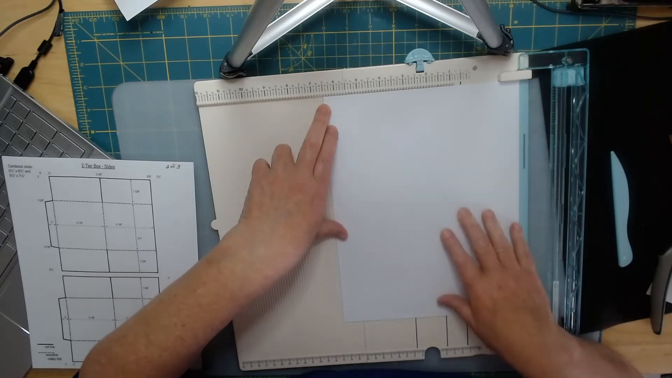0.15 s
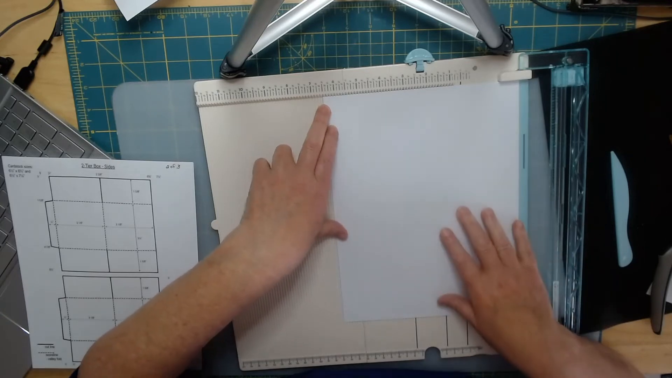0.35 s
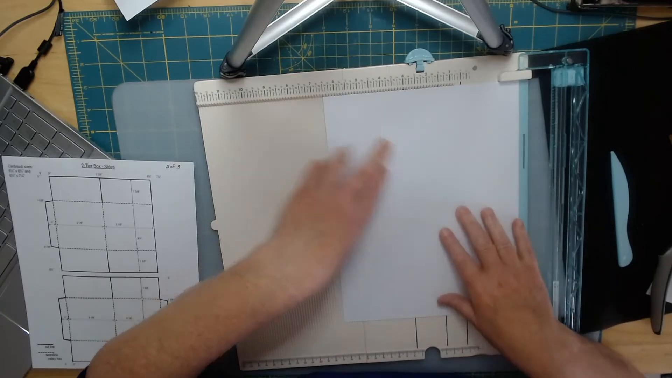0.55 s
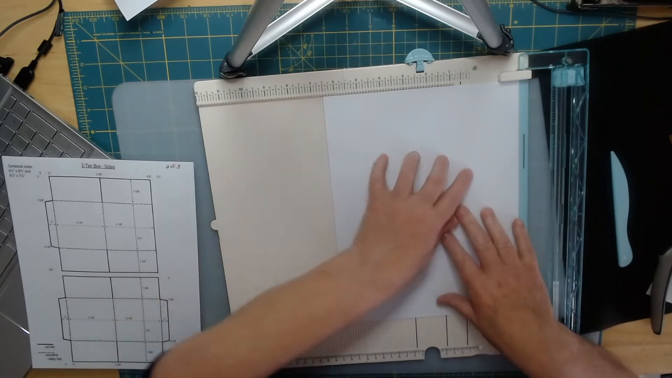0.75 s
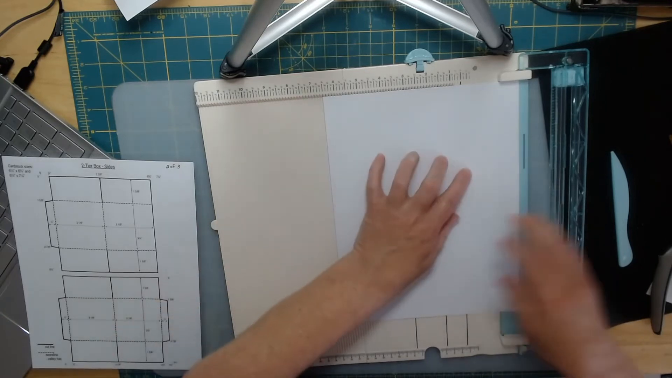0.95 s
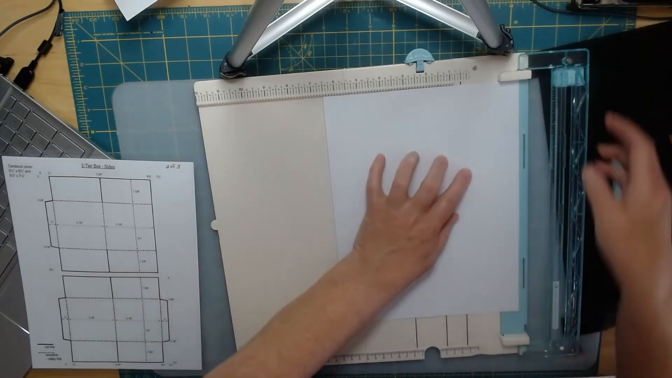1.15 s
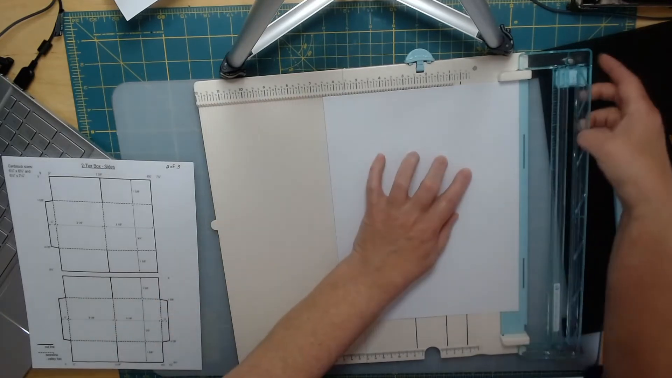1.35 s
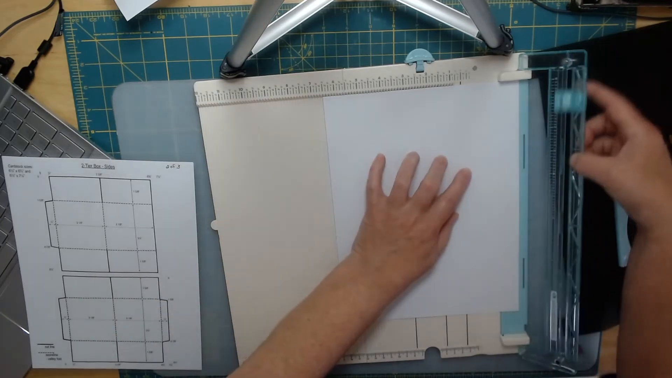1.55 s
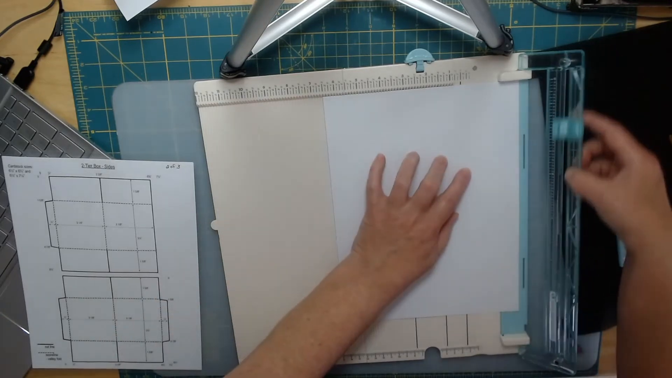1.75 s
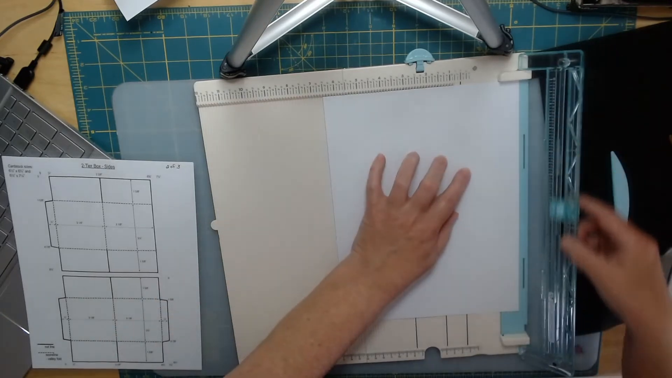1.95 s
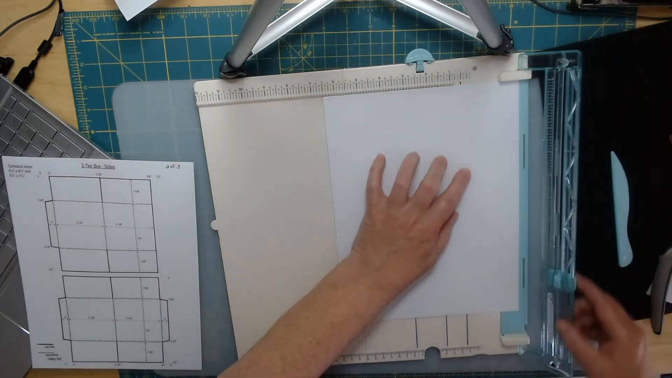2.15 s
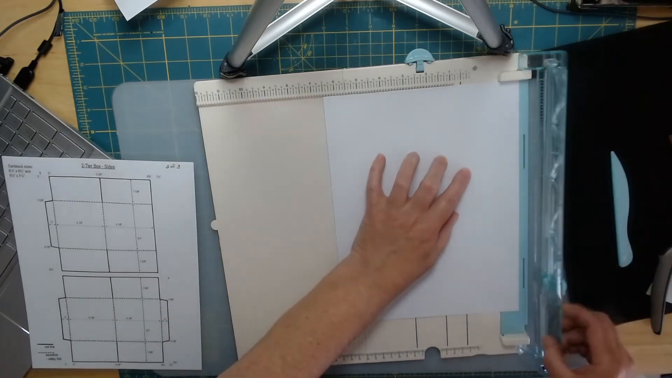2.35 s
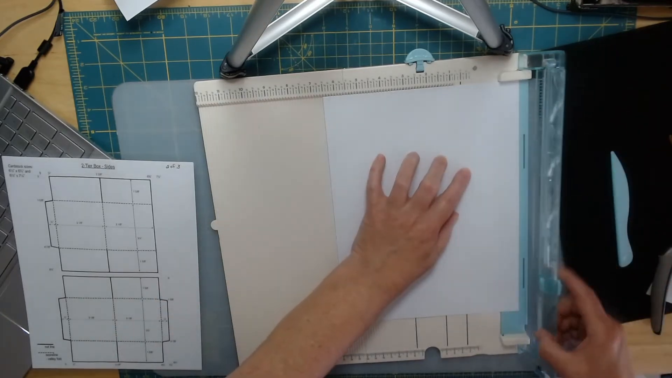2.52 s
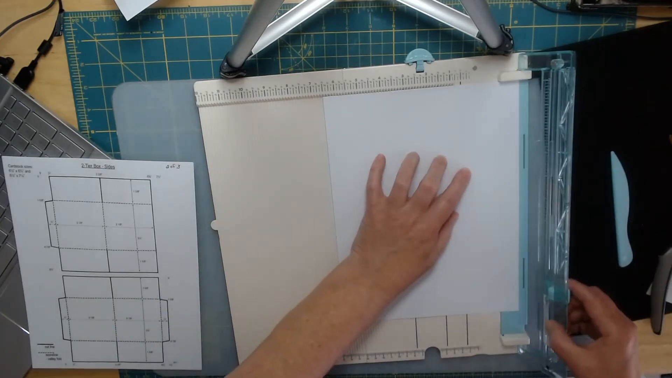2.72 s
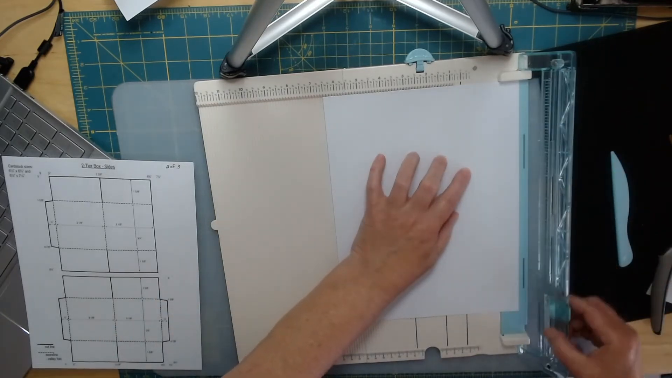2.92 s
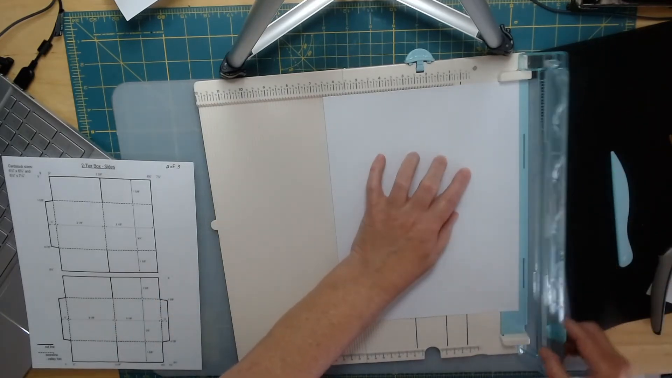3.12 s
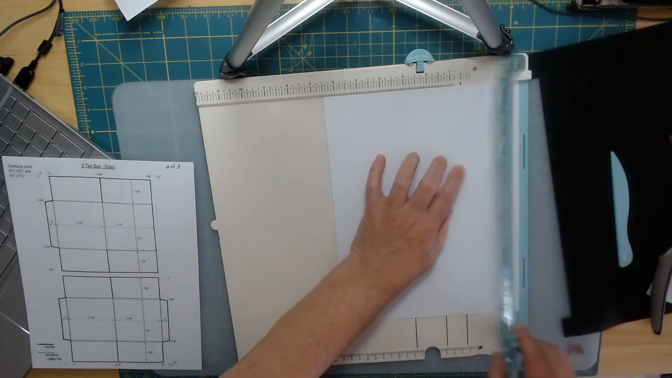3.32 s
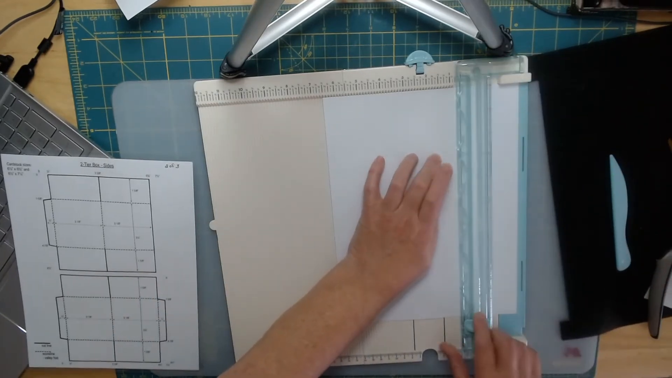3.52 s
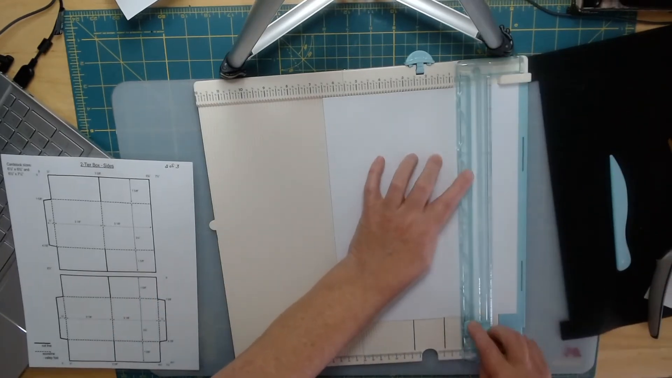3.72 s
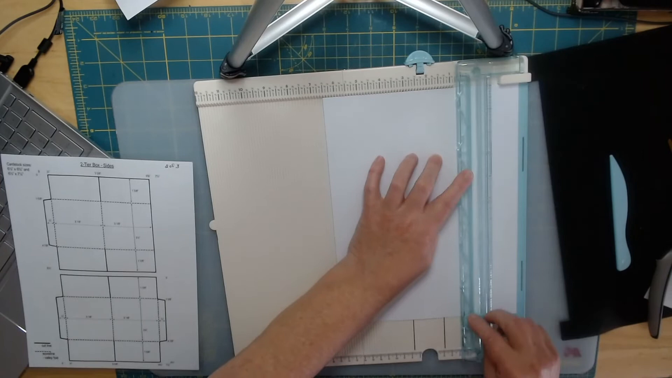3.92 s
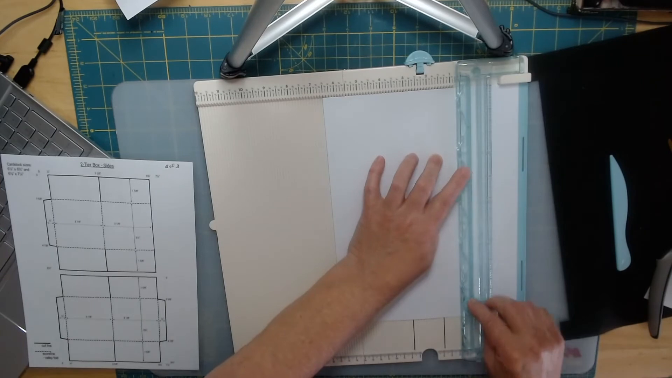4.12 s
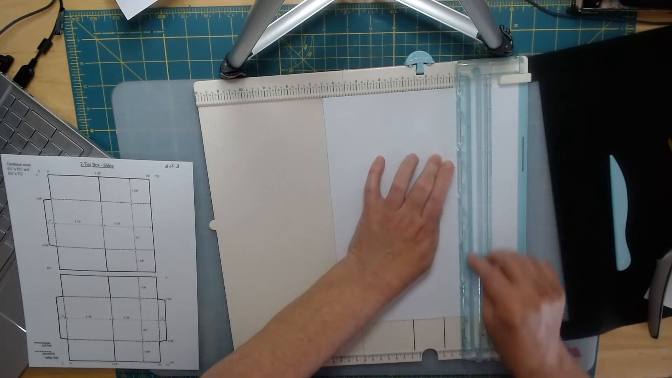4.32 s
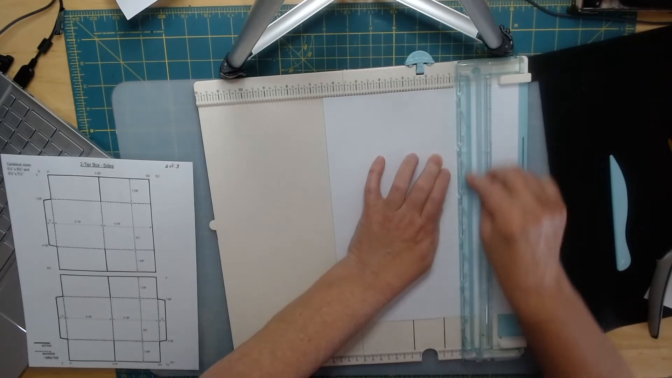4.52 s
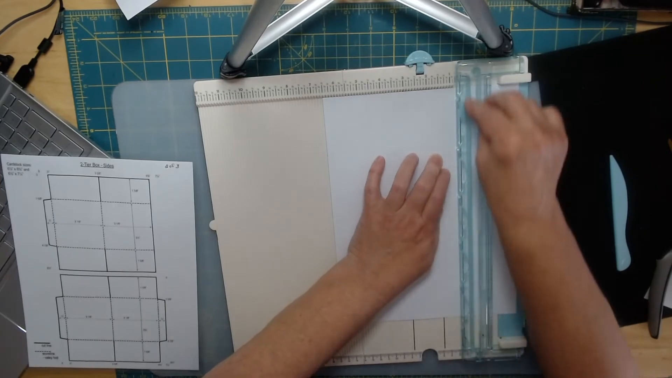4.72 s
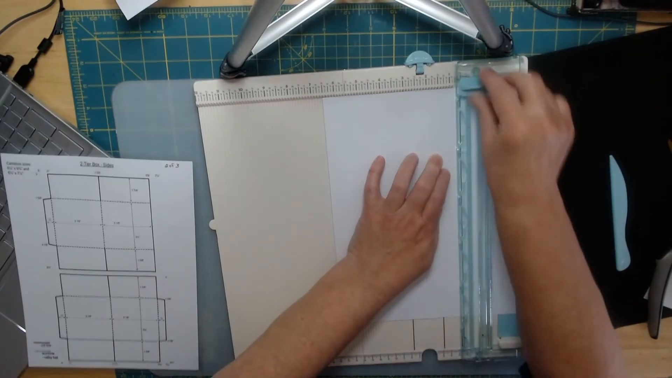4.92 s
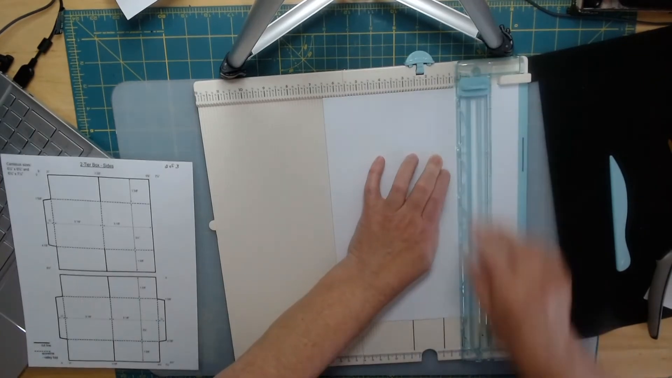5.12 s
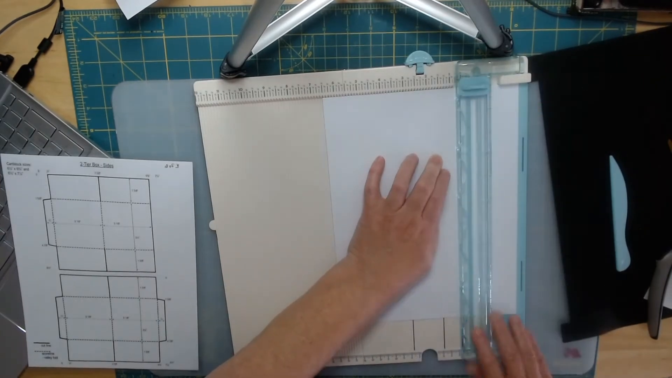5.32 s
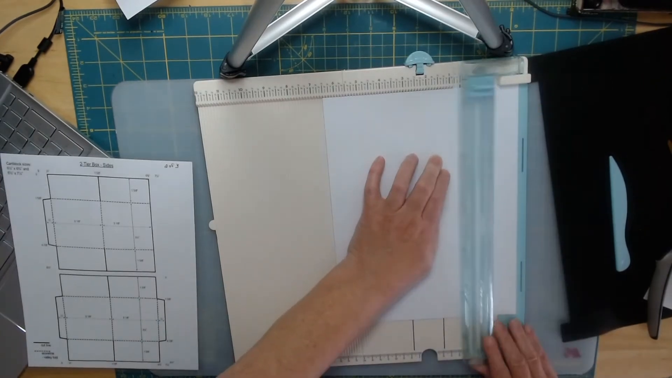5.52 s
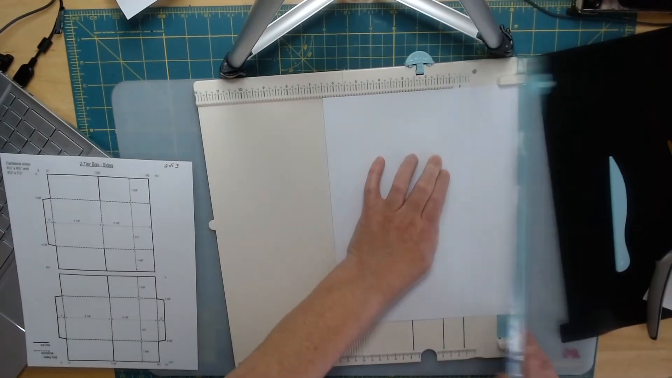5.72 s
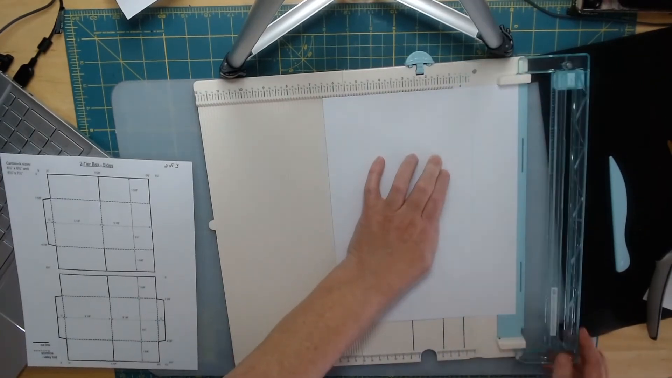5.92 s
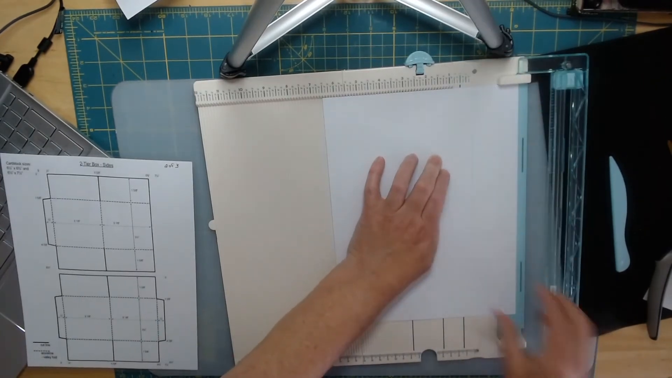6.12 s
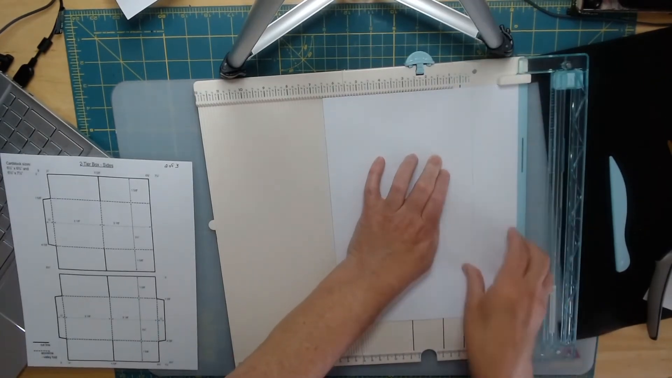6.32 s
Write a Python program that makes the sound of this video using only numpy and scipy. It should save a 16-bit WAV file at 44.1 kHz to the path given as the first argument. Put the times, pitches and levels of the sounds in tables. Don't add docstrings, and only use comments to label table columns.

```python
import sys
import numpy as np
from scipy import signal
from scipy.fft import rfft, irfft, next_fast_len
from scipy.io import wavfile
from scipy.ndimage import uniform_filter1d, map_coordinates

SR = 44100
rng = np.random.default_rng(int(sys.argv[2]) if len(sys.argv) > 2 else 0)


def field_ratio(decibels):
    return 10 ** (np.asarray(decibels, dtype=float) / 20)


def inscribe(sig):
    pcm = np.round(np.clip(np.atleast_2d(sig).T, -1, 1) * 32767)
    wavfile.write(sys.argv[1], SR, pcm.astype(np.int16))


N = 284974

# pitch_hz, width_hz, level_db
RAIL_MODES = [(1381, 150, 1.5), (1654, 700, 1), (2118, 610, 1.5), (2530, 430, 2.5), (3260, 810, -2),
              (3870, 310, -3), (4170, 550, -5.5), (4570, 200, -4.5), (4836, 140, -7)]
# pitch_hz, width_hz, level_db
BOARD_MODES = [(332, 38, -4), (481, 80, -1.5), (641.5, 89, 3), (785, 140, 0.5), (920, 61, 3),
               (981, 96, -1.5), (1124, 98, 0), (1270, 240, -9)]
# pitch_hz, width_hz, level_db
DESK_MODES = [(62, 33, 1.5), (122.5, 26, -3), (167, 39, -1), (246, 100, -4.5), (289.5, 17, 2)]
# freq_hz, level_db
EDGE_COLOUR = [(3500, -21.5), (5200, 9.5), (7000, 4), (9000, -3), (12000, -16), (15000, -31), (16500, -46),
               (17000, -120)]


def unit(x):
    return x / np.sqrt(np.mean(x ** 2) + 1e-20)


def along(points, hz):
    f, v = np.transpose(points)
    return np.interp(np.log(hz + 1), np.log(f + 1), v)


def curve(rows):
    s, db = np.transpose(rows)
    return np.interp(np.arange(N) / SR, s, db, -200, -200)


def swells(rows):
    s, rise, fall, db, *trims = np.transpose(rows)[:, :, None]
    late = np.arange(0, N + 64, 64) / SR - s
    gain = field_ratio(db - 25 * np.maximum(-late / np.abs(rise), late / np.abs(fall)))
    return [np.repeat(np.sum(gain * field_ratio(trim), axis=0), 64)[:N] for trim in [0, *trims]]


def smooth(gain):
    return uniform_filter1d(gain, size=300)


def wobble(rate):
    knots = rng.standard_normal(int(N * rate / SR) + 4)
    return map_coordinates(knots, [np.arange(N) * rate / SR])


def modes(table, hz, stir_db=0):
    c, w, db = np.transpose(table)[:, :, None]
    sign = (-1.) ** np.arange(len(table))[:, None]
    return np.sum(sign * field_ratio(db + stir_db) * 1j * hz * w / (c * c - hz * hz + 1j * hz * w), axis=0)


def body(table, hz, stir_db=0):
    return modes(table, hz, stir_db) / (1 + 1j * hz / (2.5 * table[-1][0])) ** 2


def filtered(x, response):
    size = next_fast_len(len(x) + 8192)
    return irfft(rfft(x, size) * response(np.fft.rfftfreq(size, 1 / SR)), size)[:len(x)]


def grit(spiky_db, patchy_db):
    force = rng.standard_normal(N) * field_ratio(spiky_db * wobble(780))
    z = signal.stft(force, nperseg=512)[2]
    field = uniform_filter1d(rng.standard_normal(z.shape), size=2, axis=0)
    field = uniform_filter1d(field, size=10, axis=1)
    return signal.istft(z * field_ratio(patchy_db * unit(field)), nperseg=512)[1][:N]


def quiet():
    # freq_hz, level_db
    air_colour = [(15, -47.5), (27, 0.5), (64, 4), (170, -23.5), (400, -14), (8590, -39), (14400, -44),
                  (16000, -67)]
    # pitch_hz, level_db
    whine_tones = [(59.5, -72), (5001, -91.5), (8000, -88.5), (8995, -103)]
    t = np.arange(N) / SR
    air = unit(filtered(rng.standard_normal(N), lambda hz: field_ratio(along(air_colour, hz))))
    out = field_ratio(-59.54) * air
    for hz, db in whine_tones:
        flutter = unit(wobble(hz / 12)) if hz > 1000 else 1
        out += field_ratio(db + 7) * flutter * np.sin(2 * np.pi * hz * t)
    return out


def room(x):
    # freq_hz, t60_s
    decay_times = [(100, 0.32), (700, 0.24), (2000, 0.18), (8000, 0.23), (14000, 0.099)]
    out, step = np.zeros(N + SR), SR // 3
    for start in range(0, N, step):
        hz, t, z = signal.stft(rng.standard_normal(SR // 2), SR, nperseg=256)
        fade = field_ratio(-60 * t / along(decay_times, hz)[:, None])
        tail = signal.istft(z * fade, SR, nperseg=256)[1]
        tail = np.pad(tail, (250, 0)) / np.linalg.norm(tail)
        wet = signal.fftconvolve(x[start:start + step], tail)
        out[start:start + len(wet)] += wet
    return out[:N]


def desk():
    # start_s, boom_db
    lean_on = [
        (0.0, -60.5),
        (6.22, -56),
        (6.46, -63.5),
    ]
    # peak_s, rise_s, fall_s, level_db
    drum_pushes = [(.85, 0.11, 0.12, -53), (1.5, 0.33, 1, -57.5), (2.1, .02, 0.27, -50),
                   (2.2, 0.054, 0.083, -38), (2.36, 0.0081, 0.24, -44.5), (2.52, .015, 0.43, -47),
                   (2.68, 0.033, 0.11, -43), (3.0, 0.56, 0.21, -62.5), (3.36, .1, 0.45, -45),
                   (4.3, 0.26, 0.039, -50.5), (4.7, 0.59, 0.56, -48.5), (5.56, 0.14, 0.23, -44),
                   (6.0, 0.045, 0.29, -37)]
    # peak_s, rise_s, fall_s, level_db
    panel_pushes = [
        (1.53, 0.56, 0.44, -59),
        (2.19, 0.13, 0.17, -50.5),
        (2.59, 0.5, 0.15, -56.5),
        (2.86, 0.11, 0.16, -57.5),
        (3.355, 0.092, 0.073, -31.5),
        (3.52, .3, 0.093, -42),
        (4.3, 0.71, 0.26, -52),
        (4.77, 0.43, 0.34, -43.5),
        (5.75, 0.59, 0.38, -61),
        (6.15, .35, 0.42, -55),
    ]
    shakes = []
    for part in (DESK_MODES[:1], DESK_MODES[1:2], DESK_MODES[2:]):
        shakes.append(unit(filtered(rng.standard_normal(N), lambda hz: modes(part, hz) ** 2)))
    boom = field_ratio(curve(lean_on) + 2)
    drum = field_ratio(-76) + swells(drum_pushes)[0]
    panel = field_ratio(-76) + swells(panel_pushes)[0]
    return np.sum(smooth(np.array([boom, drum, panel])) * shakes, axis=0)


def thud(db, stir_db, t):
    push = filtered(t * np.exp(-t / 0.00031), lambda hz: modes(DESK_MODES[1:], hz, stir_db))
    return field_ratio(db) * push / np.abs(push).max()


def thuds():
    # start_s, peak_db
    landings = [
        (0.608, -37),
        (0.703, -40),
        (.752, -40),
        (1.4506, -38),
        (2.662, -39),
        (3.301, -31.5),
        (5.522, -36),
        (5.552, -36.5),
        (6.03, -25.5),
        (6.239, -41),
    ]
    out, t = np.zeros(N + SR), np.arange(SR // 4) / SR
    for s, db in landings:
        stir_db = 3 * rng.standard_normal((len(DESK_MODES) - 1, 1))
        out[round(s * SR):][:len(t)] += thud(db, stir_db, t)
    return out[:N]


def knocks():
    # start_s, peak_db, pitch_hz, t60_s
    single_notes = [(.065, -39, 946, 0.041), (1.282, -36.5, 1820, 0.037), (1.3, -34.5, 1620, 0.037),
                    (2.468, -56, 1885, 0.23), (3.35, -30, 262, 0.088), (3.446, -15, 740, 0.024),
                    (3.352, -38.5, 5600, 0.017), (3.4728, -20, 11400, 0.02), (3.4728, -19, 13200, .015),
                    (3.4728, -12.5, 7530, .025), (3.4728, -22, 9200, .02), (3.473, -23.5, 722, .1),
                    (3.473, -24, 835, .1), (3.473, -22.5, 1290, .1), (3.473, -23, 470, .08),
                    (3.473, -23, 560, .05), (3.473, -27.5, 1433, .1), (3.473, -26.5, 2783, 0.09),
                    (3.473, -27.5, 2948, 0.098), (3.297, -32.5, 1230, .03), (3.33, -42, 33, 0.66),
                    (3.475, -40, 33, .5), (4.822, -35.5, 35.97, 0.33), (4.8645, -28, 1256, .03),
                    (4.8945, -34, 77, 0.16), (6.0265, -21, 4900, .02), (6.0265, -21, 3250, 0.023),
                    (6.082, -22, 1550, .03), (6.136, -27, 1600, .03), (5.962, -27.5, 775, 0.11),
                    (5.965, -31.5, 3300, 0.11), (3.362, -28.5, 300, 0.063), (2.56, -35, 2030, .04),
                    (2.672, -39, 4400, .03), (3.89, -34, 62, 0.33), (2.56, -35.5, 58, .25),
                    (.61, -40, 58.2, .2), (1.22, -40, 60, 0.22), (5.5, -38, 56, 0.24),
                    (6.05, -30, 740, 0.055), (3.473, -19, 4170, 0.11), (3.4728, -14, 15000, 0.012),
                    (3.473, -14.5, 623, 0.087), (3.471, -10.5, 1001, 0.088), (3.473, -13.5, 1115, 0.13),
                    (3.475, -20, 69, 0.22), (4.201, -36, 64, 0.57), (4.8195, -17, 69.06, 0.11),
                    (4.854, -20, 1260, 0.03), (4.929, -51, 1560, 0.32), (5.957, -24.5, 1662, 0.12),
                    (5.959, -34, 62, 0.32)]
    out, t = np.zeros(N + SR), np.arange(SR // 2) / SR
    for s, db, hz, t60 in single_notes:
        wander = 3e-5 * hz * np.cumsum(rng.standard_normal(len(t)))
        speak = (1 - np.exp(-t * hz / .4)) ** 2
        out[round(s * SR):][:len(t)] += field_ratio(db - 60 * t / t60) * speak * np.sin(2 * np.pi * hz * t + wander)
    return out[:N]


def contacts(rows, weight_db, rise, stir_db, crack):
    out, t = np.zeros((2, N + SR)), np.arange(SR // 4) / SR
    blow = 1. * (np.arange(len(t)) == 100)
    for s, db, board_db, click_db, length in rows:
        length = max(length, .003)
        shape = field_ratio(-60 * t / length) * (1 - np.exp(-t / (rise * length)))
        shape *= 1 + crack * field_ratio(-60 * t / 0.0052)
        stir = stir_db * rng.standard_normal((3, 9, 1))
        reach_hz = 1800 * field_ratio(1.1 * (click_db + 22.0))
        voices = [(.1, lambda hz: body(RAIL_MODES, hz, stir[0]) / (1 + 1j * hz / reach_hz) ** 2),
                  (board_db, lambda hz: body(BOARD_MODES, hz, stir[1, :len(BOARD_MODES)])),
                  (click_db, lambda hz: field_ratio(along(EDGE_COLOUR, hz)))]
        span = slice(round(s * SR), round(s * SR) + len(t))
        for part_db, voice in voices:
            near = filtered(shape * rng.standard_normal(len(t)), voice)
            near *= field_ratio(db + part_db - 2.0) / np.abs(near).max()
            out[:, span] += near, unit(filtered(blow, voice)) * np.std(near)
        push_db = db + 1.2 * board_db + weight_db - 9
        out[0, span] += thud(push_db, stir[2, 1:len(DESK_MODES)], t)
    return out[:, :N]


def timed(rows, contact_s):
    return [(*row, contact_s) for row in rows]


def bouncing():
    # start_s, rail_peak_db, contact_s
    falls = [
        (5.9547, -14, 0.075),
        (6.0244, -15, 0.034),
        (6.082, -15.5, 0.036),
        (6.1355, -20, 0.032),
        (6.1844, -27, 0.038),
        (6.239, -33.5, 0.057),
    ]
    hardest = max(row[1] for row in falls)
    rows = []
    for s, db, length in falls:
        lost_db = hardest - db
        rows.append((s, db, -12 + 0.77 * lost_db, -4.5 - 0.43 * lost_db, length))
    return rows


def touches():
    # start_s, rail_peak_db, board_db, click_db
    fingertips = [
        (.0443, -52.5, 4, 0.5),
        (.3277, -51.5, 1, -13),
        (.4538, -35, 3, -32),
        (.5958, -66, 20, 20.5),
        (.7016, -74, 21, -10),
        (.7435, -60.5, 12.5, 13),
        (.7865, -40, 11, -13),
        (.7974, -68.5, 35, -15),
    ]
    carriage_ticks = [
        (1.4506, -31.5, -1, -8.5),
        (1.5279, -27.5, -7, -6),
        (1.593, -23.5, -5, -14.5),
        (2.0958, -25, -5.5, -19.5),
        (2.1417, -41.5, 4.5, -30),
        (2.3537, -35, 5, -13.5),
        (2.51, -39.5, -0.5, -12.5),
        (2.5585, -34.5, 5, -25),
        (2.671, -28, -3.5, -4.5),
        (2.8419, -24, -7.5, -9.5),
    ]
    closing = [(3.1944, -36.5, 6, -42), (3.2842, -38.5, 1, -11), (3.2931, -28.5, 2, -13.5),
               (3.3506, -23, -0.5, -30), (3.4262, -33, 1, -16), (3.4444, -25.5, -10, -21),
               (3.7827, -48.5, 11.5, -17), (3.8731, -47, 14.5, -7), (3.8854, -42.5, 17, -18),
               (4.1934, -36.5, 13, -4.5), (4.8265, -20, -7.5, -24), (4.8527, -34, -16, -45)]
    unlatching = [
        (5.1063, -53.5, 0.5, -28),
        (5.181, -52, -3, -27.5),
        (5.3028, -41.5, -6, -7.5),
        (5.4871, -22.5, -10, -13),
        (5.781, -28.5, 3.5, -10),
        (5.7905, -18, -4, -9),
        (6.0384, -40, 17, 17.5),
    ]
    # start_s, rail_peak_db, board_db, click_db, contact_s
    snap = [
        (3.4716, 2, -5, -7.5, 0.068),
        (4.8228, -10, -14, -14, 0.015),
        (4.864, -31, -9, -10, 0.013),
    ]
    open_scuffs = [(.0544, -45.5, 10.5, -41, 0.089), (.3602, -49, 7.5, -18, 0.17),
                   (.4094, -49.5, 10.5, -19, 0.045), (.6069, -55, 12.5, 1, 0.073),
                   (.8298, -52.5, 7, -4, 0.08), (1.1036, -51.5, -2, -20, 0.05),
                   (1.2194, -36.5, -8, -29, 0.11), (1.2748, -42, -8, -15.5, 0.053),
                   (1.2954, -33.5, -4, -27, 0.041), (1.56, -34, -3, -28, 0.099),
                   (1.793, -43, -4, -26, 0.16), (1.9127, -39, -14, -25, 0.22),
                   (1.9842, -31.5, -3, -18, 0.098), (2.185, -43, 1, -33, 0.039),
                   (2.663, -36.5, 5, -17, 0.087), (2.8342, -41, -3, -4, 0.045)]
    held_scuffs = [(3.3219, -40.5, 7, -12, 0.098), (3.376, -32, -1.5, -15, 0.028),
                   (3.6762, -47, 4.5, -33, 0.066), (3.6993, -51, 6.5, -24, 0.027),
                   (4.9445, -47.5, 2, -26.5, 0.038), (5.3544, -53.5, 5, -22, 0.052),
                   (5.4549, -55.5, 10.5, -23, 0.09), (5.5203, -44, -5.5, -12, 0.045),
                   (5.5519, -40.5, 2.5, -21, 0.04), (5.6026, -39, 0, -23.5, 0.065),
                   (5.7449, -35.5, -5, -24, 0.032), (5.982, -26, 3, -4.5, 0.087)]
    rattles = [(3.3615, -34, -7, -11, .012), (3.3816, -34, 2, -10, .012), (3.4495, -30.5, -7.5, -8, .012),
               (4.8535, -32, -10, -9, .012), (5.4713, -45.5, 3, -25, .015), (5.529, -38, -4, -16, 0.013),
               (5.5561, -42.5, -4, -12, .015), (5.6145, -45, 2, -18, .012), (5.7192, -50, -3, -28, .02),
               (5.7511, -39, -1, -24.5, .015), (5.9612, -16, -2, -1, 0.0092), (5.9895, -21, -4, -4, .02),
               (6.0335, -22, -7, -4, .012), (6.0495, -37, 10, -12, 0.016)]
    tap = dict(rise=.034, stir_db=3.5, crack=0.25)
    scuff = dict(rise=.25, stir_db=3.5, crack=0)
    return (contacts(timed(fingertips, contact_s=0.0184), weight_db=0.0, **tap)
            + contacts(timed(carriage_ticks, contact_s=0.037), weight_db=-5.5, rise=0.026, stir_db=3.5, crack=1.4)
            + contacts(timed(closing, contact_s=0.022), weight_db=-1.0, **tap)
            + contacts(timed(unlatching, contact_s=0.025), weight_db=-3.5, **tap)
            + contacts(bouncing(), weight_db=-3, **tap)
            + contacts(snap, weight_db=-8.5, rise=.008, stir_db=-0.23, crack=0.3)
            + contacts(open_scuffs, weight_db=-4.5, **scuff)
            + contacts(held_scuffs, weight_db=-7, **scuff)
            + contacts(rattles, weight_db=-8, **tap))


def card():
    # peak_s, rise_s, fall_s, hiss_db, board_db over the hiss
    card_pushes = [
        (.001, .01, 0.011, -70, 3),
        (.054, 0.02, 0.047, -81, 35.5),
        (.345, 0.024, 0.24, -84, 0),
        (.47, 0.21, 0.24, -60, -24),
        (.61, 0.061, 0.068, -58, -9),
        (.748, 0.023, .05, -83, 4),
        (.788, 0.012, 0.0091, -54.5, -4),
        (.8, 0.022, 0.26, -71.5, 14),
    ]
    # freq_hz, level_db
    fibre_colour = [(1760, -35), (3000, -16), (3460, -16), (3750, -5), (5390, 1), (7200, 6), (8990, 1),
                    (15000, -21)]
    hiss, shake = smooth(np.array(swells(card_pushes)))
    fibres = unit(filtered(grit(spiky_db=1.5, patchy_db=-1.0), lambda hz: field_ratio(along(fibre_colour, hz))))
    board = unit(filtered(grit(spiky_db=6, patchy_db=9.5), lambda hz: body(BOARD_MODES + RAIL_MODES[:4], hz)))
    return hiss * fibres + shake * board


def streaks():
    # pitch_hz, width_hz, level_db
    narrow_modes = [(641, 71.6, 0), (940, 55, -3.5), (1214, 42, -5.5), (1420, 37, -7), (1730, 74, 0),
                    (2014, 50, -13), (2280, 57, -16), (2666, 110, -2), (3270, 100, -7), (3560, 53, -6),
                    (4190, 90, -11), (4710, 60, -8.5), (5110, 70, -8), (5820, 120, -12)]
    t, out = np.arange(N) / SR, np.zeros(N)
    for hz, w, db in narrow_modes:
        pace, turn = 2 * np.pi * rng.uniform([.6, 0], [1.6, 1])
        phase = 2 * np.pi * hz * (t + .035 * np.sin(pace * t + turn) / pace)
        out += field_ratio(db + 6 * wobble(9)) * wobble(w) * np.sin(phase)
    return unit(out)


def carriage():
    # start_s, pressure_db
    cut_stroke = [
        (3.915, -53),
        (3.99, -48.5),
        (4.044, -42.5),
        (4.14, -42.5),
        (4.39, -42.5),
        (4.708, -42),
        (4.742, -40),
        (4.83, -44),
    ]
    # start_s, pressure_db
    empty_run = [
        (1.6, -108.5),
        (1.72, -68),
        (1.856, -64),
        (1.976, -51.5),
        (2.046, -61),
        (2.174, -63),
        (2.3, -88),
    ]
    # peak_s, rise_s, fall_s, board_db, scrape_db over the board
    loose_shifts = [(1.316, 0.22, 0.17, -53.5, -22), (1.47, .01, 0.14, -48.5, -19),
                    (3.292, 0.0048, 0.16, -57, 9), (3.465, 0.1, .01, -50.5, 2.5),
                    (3.62, 0.03, 0.096, -46.5, -4), (3.9, 0.77, .01, -56.5, -11),
                    (4.86, 0.012, 0.0805, -58.5, -16.5), (5.012, .2, 0.19, -63.5, -7),
                    (5.53, .18, 0.16, -51, -6), (5.78, 0.11, .01, -45.5, -22.5),
                    (5.96, 0.0068, 0.13, -31, -21), (6.13, .06, 0.089, -44, -16.5),
                    (6.33, 0.18, 0.32, -53.5, -8.5)]
    # pitch_hz, width_hz, level_db
    runner_modes = [(8600, 1100, 13), (11100, 1500, 2), (12800, 1600, -11)]

    cut_db = curve(cut_stroke)
    run_db = curve(empty_run) + 47.5
    start_s, end_s = cut_stroke[0][0], cut_stroke[-1][0]
    travel = np.clip((np.arange(N) / SR - start_s) / (end_s - start_s), 0, 1)
    speed = np.sin(np.pi * travel ** 1.22) ** 2
    loose_board, loose_rail = swells(loose_shifts)

    scrape = field_ratio(cut_db) + field_ratio(run_db - 47.5) + loose_rail
    shake = field_ratio(cut_db - 2.5 + 4 * speed) + field_ratio(run_db - 45.5) + loose_board
    hiss = field_ratio(0.94 * (cut_db + 41.5) - 41.5 - 13.5 + 8 * speed)
    hiss += field_ratio(0.89 * run_db - 59) + field_ratio(-11.5) * loose_rail
    sing = field_ratio(0.89 * run_db - 58.5)
    uneven_db = 1.5 * wobble(45) + 1.2 * np.array([wobble(9), wobble(9), wobble(9)])
    scrape, shake, hiss = smooth(np.array([scrape, shake, hiss])) * field_ratio(uneven_db)

    held = [1, .7, 1]
    held_rail, held_board = np.multiply(RAIL_MODES, held), np.multiply(BOARD_MODES, held)
    rail = unit(filtered(grit(spiky_db=0.5, patchy_db=3.5),
                         lambda hz: body(held_rail, hz) + 0.11 * (hz > 1200) * (hz < 5000)))
    board = unit(filtered(grit(spiky_db=-1, patchy_db=3), lambda hz: body(held_board, hz)))
    edge = unit(filtered(grit(spiky_db=3.0, patchy_db=2.8), lambda hz: field_ratio(along(EDGE_COLOUR, hz))))
    runner = unit(filtered(grit(spiky_db=3, patchy_db=2), lambda hz: modes(runner_modes, hz) * (hz / 9000) ** 2))
    rubbed = scrape * rail + shake * board + hiss * edge
    return rubbed + smooth(sing) * runner + smooth(field_ratio(cut_db - 4.5)) * streaks()


def scene():
    near, blows = touches()
    notes = knocks()
    rubbing = carriage() + card()
    dulled_notes = filtered(notes, lambda hz: 1 / (1 + (hz / 12500) ** 6))
    soft = near + rubbing + room(field_ratio(-6.0) * blows + field_ratio(-9.0) * (rubbing + dulled_notes))
    soft = filtered(soft, lambda hz: 1 / (1 + (hz / 14900) ** 80))
    return (notes + soft + desk() + quiet() + thuds())[None]


def band_limit(x):
    return signal.sosfilt(signal.butter(12, 16670, fs=SR, output="sos"), x)


def record(dry):
    soft = dry / (1 + np.abs(dry / .95) ** 4) ** .25
    soft = filtered(soft[0], lambda hz: .03 + .97 / (1 + (hz / 15750) ** 90))[None]
    return band_limit(soft)


dry = scene()
out = record(dry)
inscribe(out)
```